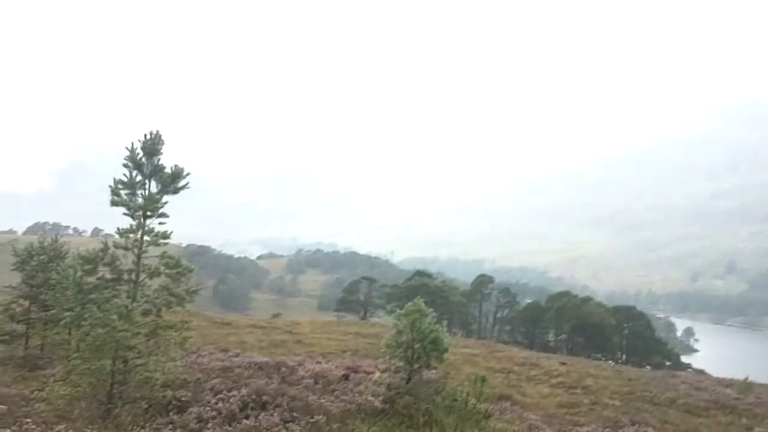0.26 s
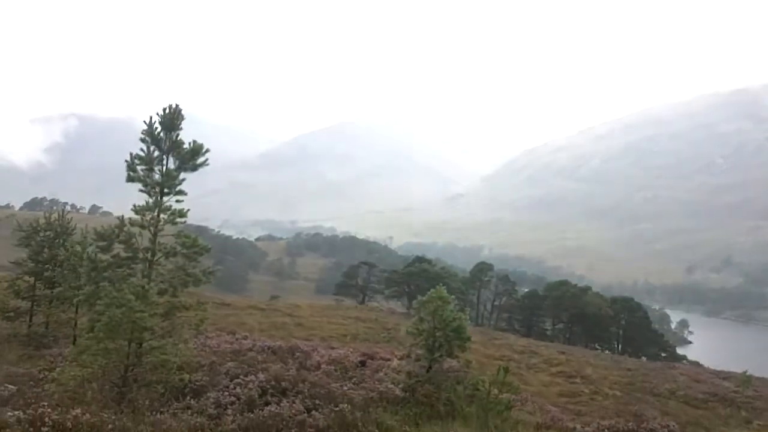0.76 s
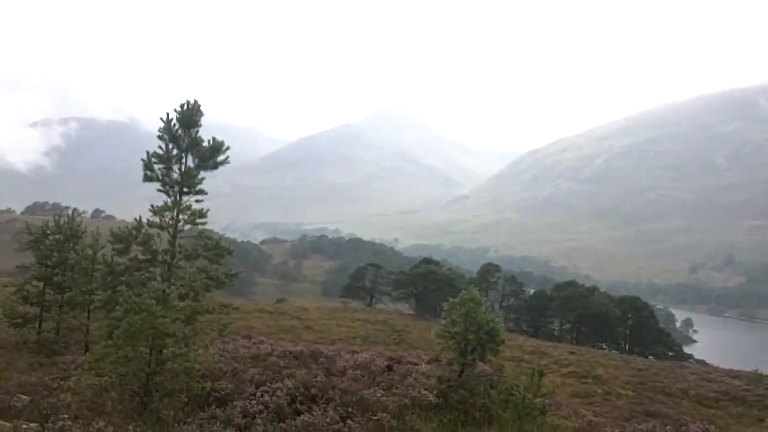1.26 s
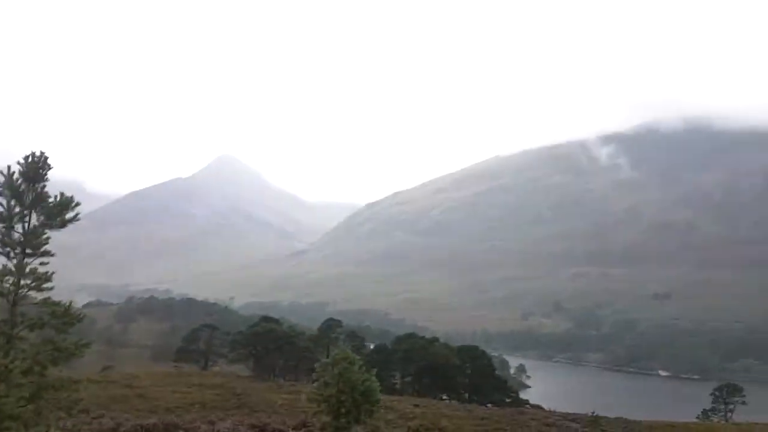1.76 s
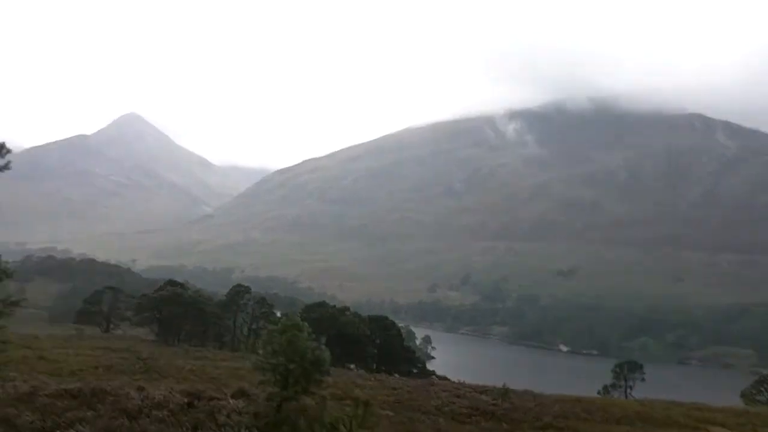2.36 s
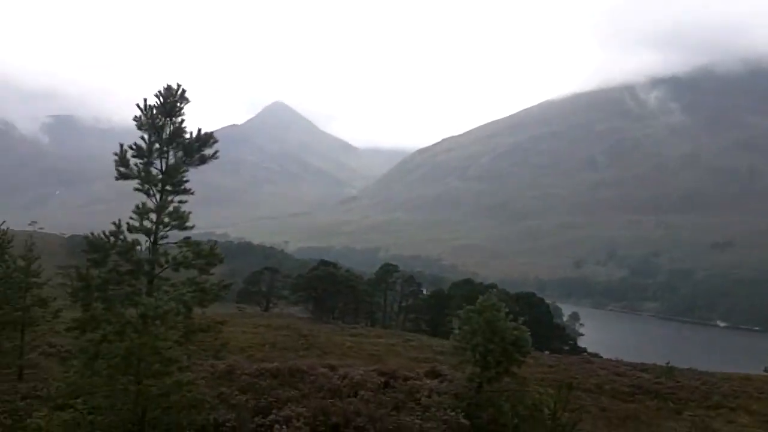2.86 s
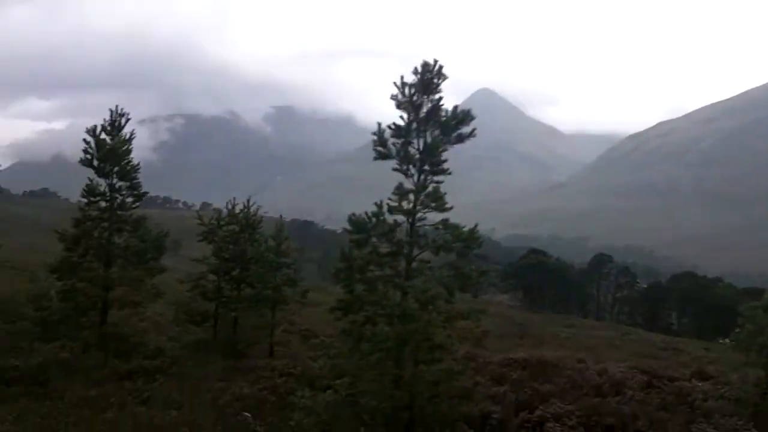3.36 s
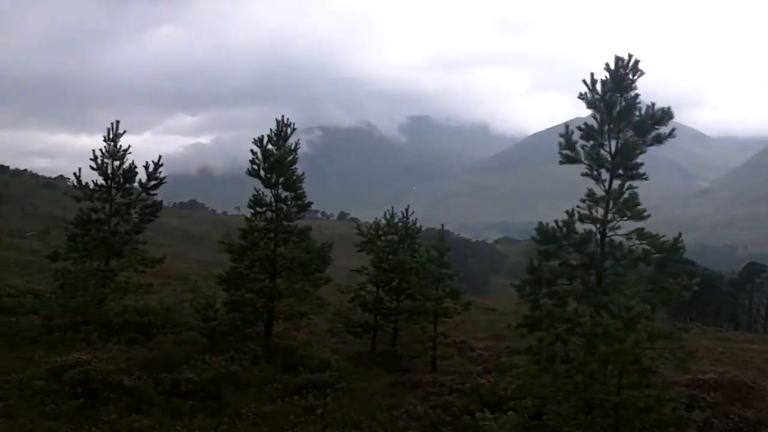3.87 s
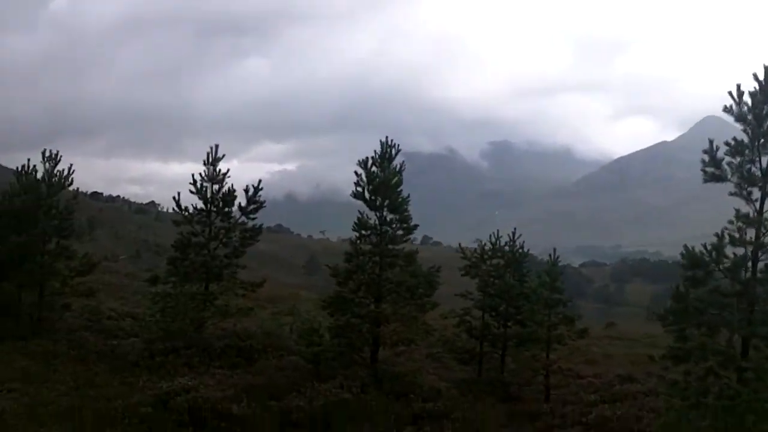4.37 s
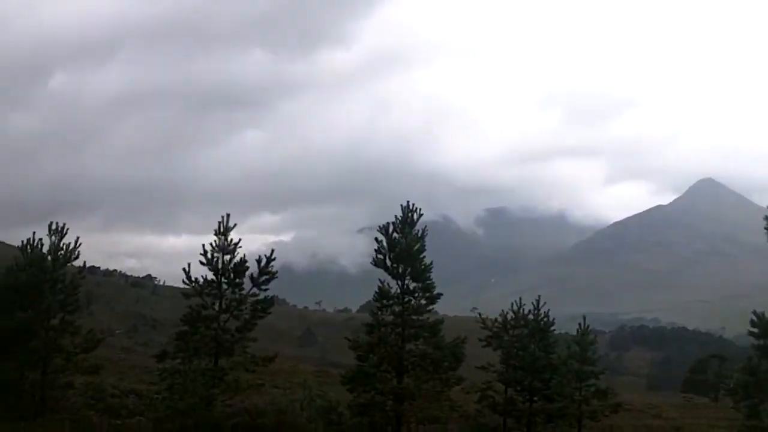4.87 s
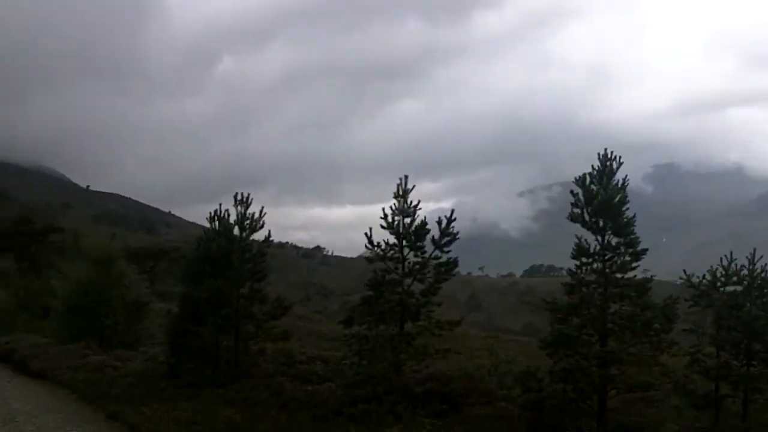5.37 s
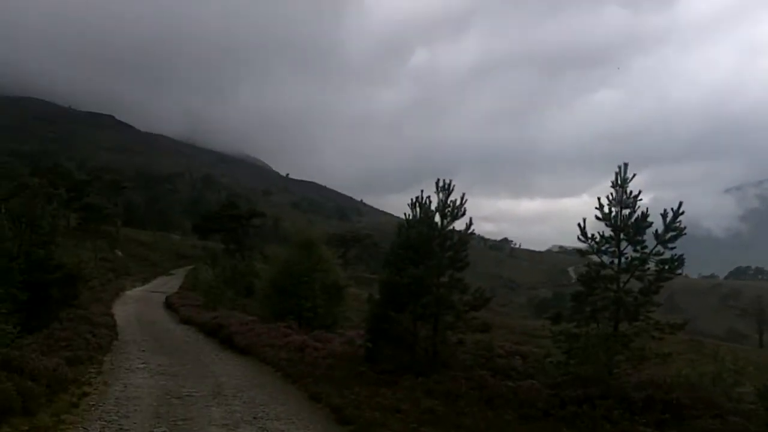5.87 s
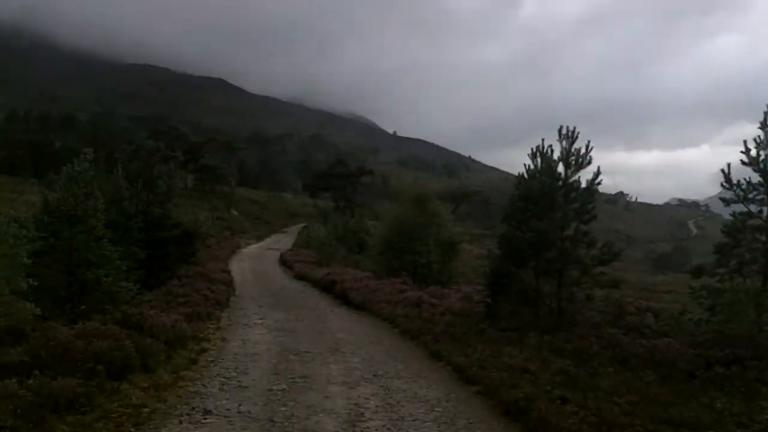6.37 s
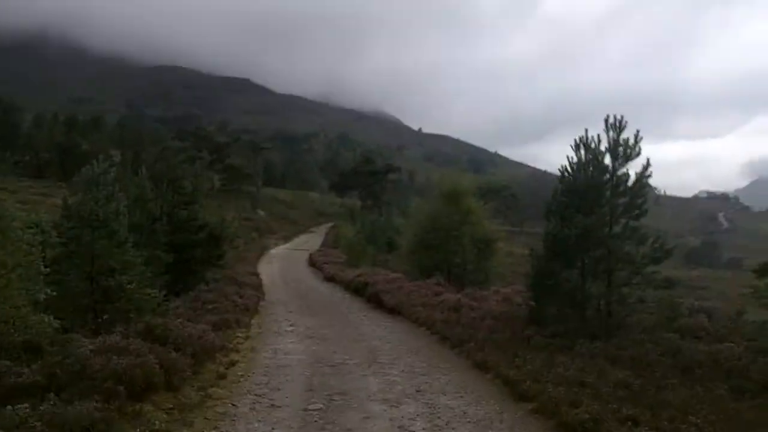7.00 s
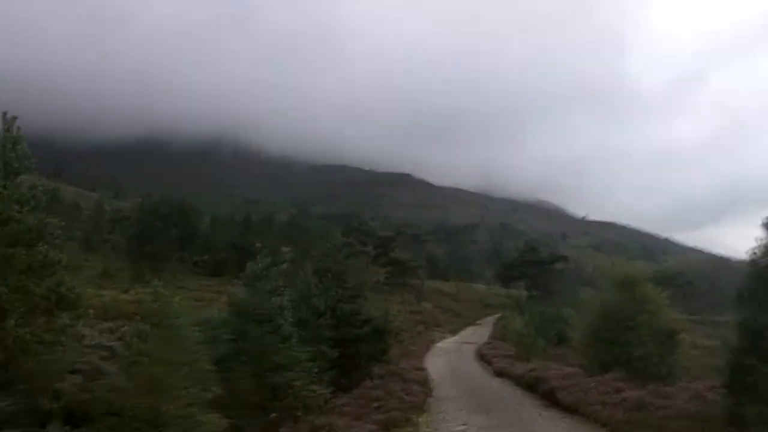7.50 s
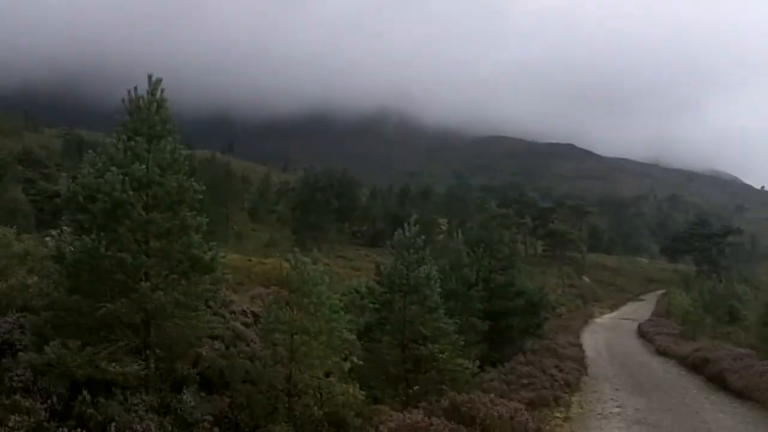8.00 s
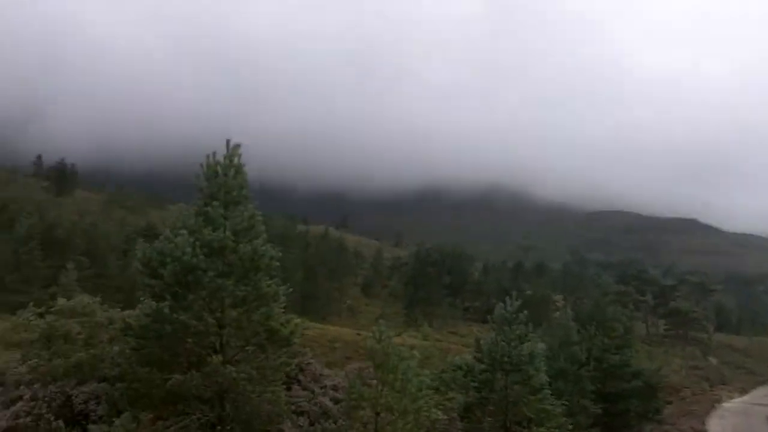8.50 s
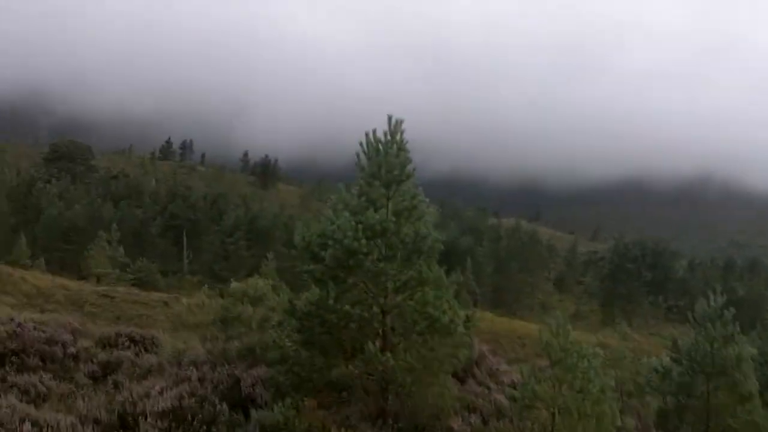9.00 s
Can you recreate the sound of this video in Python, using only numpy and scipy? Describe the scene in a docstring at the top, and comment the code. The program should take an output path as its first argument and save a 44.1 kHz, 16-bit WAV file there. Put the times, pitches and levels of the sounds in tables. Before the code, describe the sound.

A slow walk along a wet gravel trail, heard from a phone held under an umbrella. Small drops tick constantly on the taut canopy, with fatter drops tapping louder. Quiet gritty footsteps go on steadily below, and rain hisses thinly over the heather. Light wind flutters turn into low, blustery buffets in the last third, joined by nylon swishes, small sharp clicks and muffled handling knocks. Open air, no echo.

```python
"""A wet gravel trail on a heather moor in light rain: someone walks slowly up it under an umbrella, with a phone.
Drops strike the taut canopy as short decaying modes; boots crunch about twice a second as stones ring in grains.
A nylon sleeve swishes as filtered grains, the umbrella's frame clicks as struck modes, its cloth crackles, and
dull damped bumps come from the hand, then from low wind buffets. Behind lies a steady rain hiss; wind buffets
the microphone as pressure lumps, gently at first and harder after the walker turns."""
import sys
import numpy as np
from scipy import signal
from scipy.fft import rfft, irfft, next_fast_len
from scipy.io import wavfile
from scipy.ndimage import uniform_filter1d

SR = 44100
rng = np.random.default_rng(int(sys.argv[2]) if len(sys.argv) > 2 else 0)


def store_pcm(level_fs):
    """Save levels as 16-bit WAV."""
    pcm = np.round(np.clip(level_fs, -1, 1) * 32767).astype(np.int16)
    wavfile.write(sys.argv[1], SR, np.atleast_2d(pcm).T)


N = 407925
TIME = np.arange(N) / SR  # s

# Every level_db below is relative: later gains and filters scale it.
# Spectra, as freq_hz, gain_db: rain on heather
RAIN_SPECTRUM = [(30, 28.5), (100, -12.5), (250, 7), (500, 3.5), (1200, 0.5), (2200, -4), (3200, -8.5),
                 (4700, -1), (6000, -8.5), (7500, -18), (9500, -17), (15000, -18.5)]
# flexing canopy cloth: freq_hz, gain_db
CLOTH_SPECTRUM = [(200, 26.5), (600, -6), (1800, 3), (3000, 6), (4000, 6), (5000, -17), (7000, -30)]
# woven nylon: freq_hz, gain_db
NYLON_SPECTRUM = [(500, -4.5), (2500, -14.5), (4600, -4), (6200, -6), (7600, -18), (9500, -9), (12200, -14),
                  (13300, -21), (15000, -19.5)]
# stones grinding: freq_hz, gain_db
CRUNCH_SPECTRUM = [(100, -10), (350, -7), (900, -4), (1800, -1), (2500, -5.5), (3500, 1.5), (6000, -41)]
# fine wet grit: freq_hz, gain_db
GRIT_SPECTRUM = [(1200, -40), (2500, -16.5), (3500, -4.5), (4700, 0), (5300, -8.5), (6300, -13.5),
                 (7500, -17.5), (9500, -20), (13000, -30)]
# canopy shiver after a drop: freq_hz, gain_db
SHIVER_SPECTRUM = [(200, 20), (600, 0.5), (1800, 19.5), (3200, 10), (4700, 26), (6000, -1), (9000, -13)]
# spray, and the frame's rattle: freq_hz, gain_db
SPRAY_SPECTRUM = [(1000, -50.5), (3000, -4.5), (4600, 4), (6300, -26), (8000, -37.5), (14000, -53)]
# Breeze between gusts: time_s, level_db
BREEZE_LEVELS = [(0, -51), (.8, -61), (1.15, -50), (1.58, -66), (1.78, -52), (2.35, -46.5), (2.65, -57.5),
                 (3.0, -51), (4.1, -62.5), (4.6, -50.5), (5.65, -59), (5.9, -42), (6.4, -44.5),
                 (6.7, -37.5), (7.55, -42.5), (7.77, -58), (8.0, -41.5), (9.25, -44.5)]
# Gusts at the microphone: peak_s, length_s (decay time constant), level_db
GUST_EVENTS = [(0.035, 0.048, -38.5), (0.382, 0.024, -42.5), (0.548, 0.043, -48), (1.067, 0.044, -44),
               (1.27, 0.18, -56), (2.05, .05, -51), (2.257, 0.049, -54), (2.5, 0.021, -48.5),
               (2.783, 0.1, -50.5), (3.011, 0.046, -43), (5.797, 0.022, -40.5), (5.994, 0.051, -30.5),
               (6.124, 0.031, -36), (6.274, 0.026, -37.5), (6.541, 0.028, -41), (6.714, 0.069, -39.5),
               (6.934, 0.051, -34.5), (7.168, 0.15, -49), (7.362, 0.025, -46), (7.55, 0.2, -48),
               (7.987, 0.038, -36), (8.193, 0.042, -31.5), (8.357, 0.033, -39.5), (8.69, .1, -45.5),
               (8.945, 0.06, -34.5), (9.24, 0.074, -27)]
# Dull bumps: the hand on handle and phone (7.7-7.93 s), then low wind buffets at the microphone:
# start_s, pitch_hz, level_db
DULL_BUMPS = [(7.717, 454, -25.5), (7.85, 314, -28.5), (7.863, 430, -28), (7.878, 400, -32),
              (7.904, 530, -23), (7.922, 530, -27), (8.142, 260, -21), (9.222, 240, -13)]
# Clicks of the umbrella's frame: start_s, level_db
FRAME_CLICKS = [(6.829, -29), (6.8604, -32.5), (7.0801, -25), (7.211, -18.5), (7.6705, -33),
                (7.8014, -33.5)]
# Modes of the frame: pitch_hz, level_db, t60_s
FRAME_MODES = [(3880, -2, 0.0028), (4270, -2.5, 0.0078), (4710, 1, 0.0068), (5760, -3, 0.0069),
               (9400, -19.5, 0.01), (12300, -28, .003)]
# Crackles of the flexing canopy: centre_s, level_db
CANOPY_FLEXES = [(6.798, -32.5), (6.809, -51), (6.817, -31), (6.83, -24.5)]
# Sleeve strokes: start_s, length_s, level_db
SLEEVE_STROKES = [(5.39, 0.022, -44.5), (5.865, 0.063, -42), (5.907, 0.16, -49), (6.15, 0.023, -55),
                  (6.776, 0.067, -40), (6.848, 0.16, -48), (6.92, 0.25, -46), (7.146, 0.072, -55),
                  (7.726, 0.1, -54.5), (8.438, 0.11, -55.5), (8.916, 0.028, -43.5)]
# Footfalls: heel_s, heel_length_s, crunch_db, grit_db, roll_delay_s, roll_re_heel_db
FOOTFALLS = [(0.16, 0.15, -53.5, -53, 0.082, -1), (0.62, 0.091, -53.5, -50, 0.057, -9),
             (1.23, 0.13, -57, -57.5, 0.12, -4), (1.66, 0.029, -48, -46, 0.17, -7),
             (2.292, 0.032, -52, -47, 0.15, -12.5), (2.79, 0.17, -61, -54.5, .15, -24),
             (3.358, 0.054, -48.5, -49.5, 0.12, -13.5), (3.851, 0.089, -52, -50.5, 0.078, -13),
             (4.391, 0.081, -51, -48.5, 0.32, -6), (4.91, 0.033, -50.5, -49, 0.13, -15),
             (5.45, 0.072, -60.5, -60.5, 0.14, -1.5), (5.96, 0.082, -52, -47, 0.12, -27),
             (6.468, 0.047, -49.5, -50, 0.18, -7.5), (6.96, 0.22, -56, -51, 0.2, -15),
             (7.532, 0.07, -52.5, -52, 0.21, -4.5), (8.0, 0.075, -53, -50.5, 0.32, -15),
             (8.542, 0.073, -49.5, -50.5, 0.076, -9.5), (8.94, 0.081, -54.5, -49.5, 0.13, -1)]
# Fattest drops on the canopy: start_s, thud_db, thud_pitch_hz, tick_db
FAT_DROPS = [(0.468, -35, 1310, -39), (0.513, -32, 1500, -43), (0.611, -46, 1110, -32),
             (0.822, -36.5, 1370, -62), (0.84, -37, 1220, -50), (0.89, -43, 2100, -44),
             (0.936, -42, 1590, -41), (1.143, -40, 1150, -40), (1.246, -27, 1070, -51),
             (1.559, -33.5, 1650, -46), (1.627, -38.5, 1090, -39), (2.077, -38.5, 1740, -35.5),
             (2.3, -35, 1110, -50), (2.544, -33.5, 1210, -47), (2.718, -42, 1900, -39),
             (3.039, -38, 1050, -44), (3.13, -40, 1280, -43.5), (3.825, -38, 910, -32),
             (3.988, -35, 2010, -49), (4.484, -57, 1670, -39), (4.833, -53, 1940, -30.5),
             (5.157, -37, 1440, -61), (5.207, -37.5, 1180, -63), (5.294, -37, 1610, -65),
             (5.589, -36.5, 1290, -47), (5.807, -36, 1060, -41), (5.986, -29, 1250, -42),
             (6.219, -50, 1240, -42.5), (6.808, -20.5, 1890, -32), (6.862, -28.5, 1000, -27),
             (7.554, -23, 620, -50), (7.884, -31.5, 1440, -32.5), (8.262, -34, 1930, -40),
             (8.298, -37, 1370, -41), (8.977, -26.5, 1450, -33), (9.223, -30, 1310, -32.5)]
# Narrow dips in the phone's response: freq_hz, width_hz
RESPONSE_DIPS = [(2720, 570), (5490, 760), (7850, 1670), (10930, 1200)]

TOP_HZ = 15400  # upper edge of the phone's response
ROLL_S = 0.1  # rise and decay time of the sole's roll over the stones
SHIFT_CRUNCH_DB, SHIFT_GRIT_DB = -69.5, -70  # stones shifting under the standing foot
GUST_RISE = 0.92  # build-up time of a gust, as a share of its length
GUST_SWELL_DB, BREEZE_FLUTTER_DB = 2.5, -12  # large eddies in a gust, small eddies in the breeze


def undb(db):
    """Logarithmic level: decibels become an amplitude ratio."""
    return 10 ** (np.asarray(db) / 20)


def unit(x):
    """Power normalisation: scale to rms 1."""
    return x / np.sqrt(np.mean(x ** 2))


def colour(x, points):
    """Minimum-phase filtering: a causal filter follows the spectrum's shape; the result has rms 1."""
    hz, db = np.transpose(points)
    size = next_fast_len(len(x) + SR // 4)
    bins = np.maximum(np.arange(size // 2 + 1) * SR / size, 1)
    gain = undb(np.interp(np.log(bins), np.log(hz), db))
    cepstrum = irfft(np.log(gain), size)
    cepstrum[size // 2:] = 0  # keeping only the causal half makes the phase minimal
    response = np.exp(2 * rfft(cepstrum))
    return unit(irfft(rfft(x, size) * response, size)[:len(x)])


def add(out, s, sound):
    """Superposition: mix a sound in at time s."""
    i = max(int(s * SR), 0)
    part = out[i:i + len(sound)]
    part += sound[:len(part)]


def surge(s, rise, fall):
    """Growth and relaxation: a Gaussian rise to 1 at time s, then exponential decay."""
    return np.exp(-np.where(TIME < s, ((TIME - s) / rise) ** 2, (TIME - s) / fall))


def ring(t, hz, t60):
    """Damped resonance: one struck mode decays exponentially, with peak 1."""
    wave = np.sin(2 * np.pi * hz * t) * np.exp(-np.log(1000) * t / t60)
    return wave / np.abs(wave).max()


def grains(rate, spread_db):
    """Shot noise: random tiny impacts, rate a second, many weak and a few strong if spread_db is above 0."""
    when, size, side = rng.random((int(rate * N / SR), 3)).T
    gain = undb(spread_db * np.minimum(-np.log(size), np.pi))
    return np.bincount((when * N).astype(int), gain * np.sign(side - .5), N)


def pebbles(spectrum, pitches, rate, spread_db, q, patchy_db):
    """Granular resonance: each grain size knocks independently, with its own short ring and flurries."""
    knocks, moments = 0, np.arange(0, N / SR, 1 / 40)
    for hz in pitches:
        activity = rng.uniform(-1.8, 1, len(moments))
        flurry = undb(patchy_db * np.interp(TIME, moments, activity))
        resonator = signal.iirpeak(hz, q, fs=SR)
        knocks += signal.lfilter(*resonator, flurry * grains(rate, spread_db)) / np.sqrt(hz)
    return colour(knocks, spectrum)


def moor():
    """Summation of many impacts: dense, equal grains make the soft, even hiss of rain on heather."""
    return colour(grains(rate=10000, spread_db=0), RAIN_SPECTRUM) * undb(-53)


def eddies(strength, hz, octaves, rise, size, count):
    """Turbulent advection: eddies pass the port as smooth pressure lumps, faster in strong wind."""
    x = np.zeros(N)
    for when, scale, weight, side in rng.random((count, 4)):
        speed = (strength[int(when * N)] / strength.max()) ** rise
        pace = hz * 2 ** (octaves * (scale - .5)) * speed
        turn = np.pi * pace * np.arange(-SR // pace, SR // pace) / SR
        lump = (1 - 2 * turn ** 2) * np.exp(-turn ** 2)
        height = np.sign(side - .5) * np.log(1 - weight) * undb(-6.0 * scale)
        add(x, when * N / SR - 1 / pace, height * lump)
    x = unit(x)
    # even out the running level so that strength sets the loudness
    return strength * x / np.sqrt(uniform_filter1d(x ** 2, size) + 0.0029)


def wind():
    """Turbulence scales: the breeze brings mostly large, swelling eddies, gusts mostly small, fluttering ones."""
    breeze = undb(np.interp(TIME, *np.transpose(BREEZE_LEVELS)))
    gusts = sum(undb(db) * surge(s, GUST_RISE * length, length) for s, length, db in GUST_EVENTS)
    large = np.hypot(breeze, undb(GUST_SWELL_DB) * gusts)
    small = np.hypot(gusts, undb(BREEZE_FLUTTER_DB) * breeze)
    swell = eddies(large, hz=23.0, octaves=1.33, rise=0.16, size=SR // 8, count=450)
    flutter = eddies(small, hz=106, octaves=2.26, rise=0.18, size=SR // 20, count=2200)
    return undb(-1.0) * swell + undb(6.5) * flutter


def dull_bumps():
    """Soft onset: a slow push excites little treble, so each hand bump or wind buffet is a dull wave or two."""
    out, t = np.zeros(N), np.arange(SR // 8) / SR
    for s, hz, db in DULL_BUMPS:
        push = np.tanh(1.6 * hz * t)
        add(out, s, undb(db) * ring(t, hz, 2.6 / hz) * push)
    return out


def frame():
    """Modal excitation: ribs snap against their joints and ring; a faint rattle follows each click."""
    out, t = np.zeros(N), np.arange(SR // 16) / SR
    push = np.tanh(t / 0.0001) ** 2  # the contact takes a moment, which keeps the click from splattering across the spectrum
    click = push * sum(undb(db) * ring(t, hz, t60) for hz, db, t60 in FRAME_MODES)
    fade = np.exp(-np.log(1000) * t / 0.028)
    for s, db in FRAME_CLICKS:
        rattle = undb(-22) * colour(rng.standard_normal(len(t)), SPRAY_SPECTRUM) * fade
        add(out, s, undb(db + 5.5) * (click + rattle))
    return out


def crumple():
    """Buckling: the taut cloth flexes and crackles in brief bursts as the umbrella is swung round."""
    flex = sum(undb(db) * np.exp(-((TIME - s) / 0.0039) ** 2) for s, db in CANOPY_FLEXES)
    pitches = (543, 1190, 1600, 3270, 3750, 4400)  # Hz
    return flex * pebbles(CLOTH_SPECTRUM, pitches, rate=900, spread_db=6.0, q=3.5, patchy_db=0.5)


def sleeve():
    """Sliding friction: woven nylon rubs over itself in short, finely grained half-sine strokes."""
    speed = 0
    for s, length, db in SLEEVE_STROKES:
        speed = speed + undb(db) * np.sin(np.pi * np.clip((TIME - s) / length, 0, 1))
    return speed * colour(grains(rate=4000, spread_db=4.5), NYLON_SPECTRUM) * undb(-1.0)


def boots():
    """Granular friction: heel strike, then rolling sole, load the ground; stones grind and wet grit crackles."""
    crunch, grit = undb(SHIFT_CRUNCH_DB) ** 2, undb(SHIFT_GRIT_DB) ** 2  # powers
    for s, length, crunch_db, grit_db, delay, roll_db in FOOTFALLS:
        heel = surge(s, length, length)
        roll = undb(roll_db) * surge(s + delay, ROLL_S, ROLL_S)
        load = heel ** 2 + roll ** 2
        crunch = crunch + load * undb(crunch_db) ** 2
        grit = grit + load * undb(grit_db) ** 2
    stone_hz = (441, 702, 1035, 1350, 1840, 2170)
    sand_hz = (3060, 3890, 4810, 6070, 10300)
    stones = pebbles(CRUNCH_SPECTRUM, stone_hz, rate=300, spread_db=5.0, q=3.5, patchy_db=10) * undb(4.5)
    sand = pebbles(GRIT_SPECTRUM, sand_hz, rate=650, spread_db=5.0, q=5.4, patchy_db=6) * undb(3.0)
    return np.sqrt(crunch) * stones + np.sqrt(grit) * sand


def strike(rows, cycles, tick_hz, tick_t60, snap_db, shiver_db, shiver_t60):
    """Membrane impact: each drop snaps, dents the cloth (a thud) and ticks; canopy shivers, spray flies."""
    out, t = np.zeros(N), np.arange(SR // 32) / SR
    shiver = colour(rng.standard_normal(SR), SHIVER_SPECTRUM)
    spray = colour(rng.standard_normal(SR), SPRAY_SPECTRUM)
    fade = undb(shiver_db) * np.exp(-np.log(1000) * t / shiver_t60)
    snap = undb(snap_db) * ring(t, 3500, 0.0018)
    for (s, thud_db, hz, tick_db), (tune, place) in zip(rows, rng.random((len(rows), 2))):
        stretch = int(place * (SR - len(t))) + np.arange(len(t))  # a random piece of the noise
        thud = ring(t, hz, cycles / hz) + fade * shiver[stretch]
        tick = ring(t, tick_hz * (1 + 0.09 * (tune - .5)), tick_t60) + snap + fade * spray[stretch]
        add(out, s, -undb(thud_db) * thud - undb(tick_db) * tick)
    # water is soft: little extreme treble
    return signal.sosfilt(signal.butter(2, 10000, fs=SR, output="sos"), out)


def drizzle(count=640):
    """Tension and pitch: small drops fall all over the canopy, whose local tension (random) sets each pitch."""
    when, size, place, sharp = rng.random((count, 4)).T
    db = -51 + 5.42 * np.minimum(-np.log(size), np.pi)
    hz = 750 * 2 ** (1.62 * place)
    tick_db = db - 10 + 14 * (sharp - .5)
    rows = np.column_stack([when * N / SR, db, hz, tick_db])
    return strike(rows, cycles=0.71, tick_hz=4170, tick_t60=0.0024, snap_db=-1, shiver_db=-11.5, shiver_t60=0.021)


def big_taps():
    """Damped membrane response: fat drops land just above the phone, each a crisp tap with a short shiver."""
    taps = strike(FAT_DROPS, cycles=3.5, tick_hz=4430, tick_t60=0.004,
                  snap_db=-4, shiver_db=-14, shiver_t60=0.022)
    return undb(4.5) * taps


def scene():
    """Superposition: all sources add at the one microphone."""
    background = moor() + wind()
    incidents = dull_bumps() + frame() + crumple() + sleeve()
    drops = drizzle() + big_taps()
    return (background + incidents + boots() + drops)[None]


def record(dry):
    """Linear filtering: the phone's response has a few narrow dips and a steep top edge."""
    for hz, width in RESPONSE_DIPS:
        dry = signal.lfilter(*signal.iirnotch(hz, hz / width, fs=SR), dry)
    return signal.sosfilt(signal.ellip(10, .2, 70, TOP_HZ, fs=SR, output="sos"), dry)


dry = scene()
out = record(dry)
store_pcm(out)
```